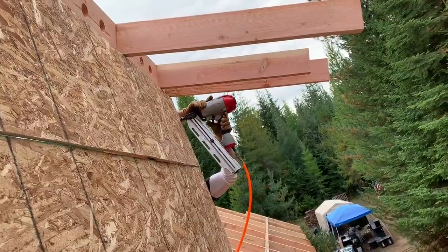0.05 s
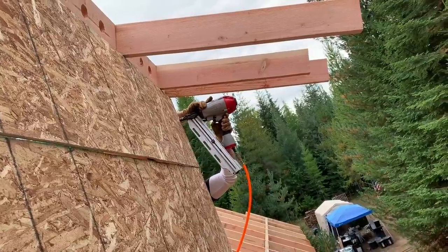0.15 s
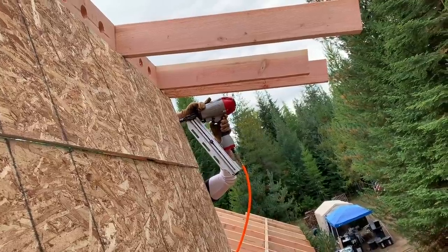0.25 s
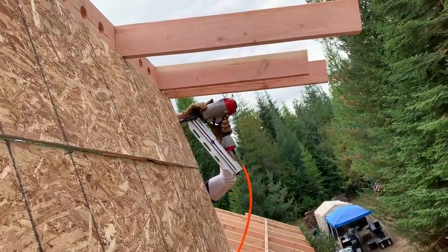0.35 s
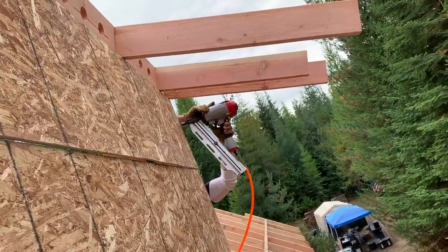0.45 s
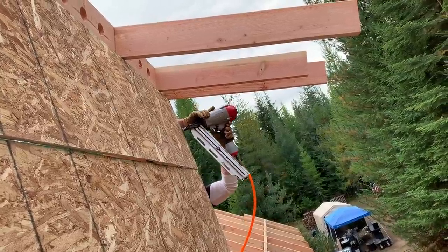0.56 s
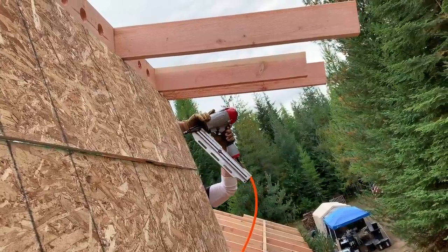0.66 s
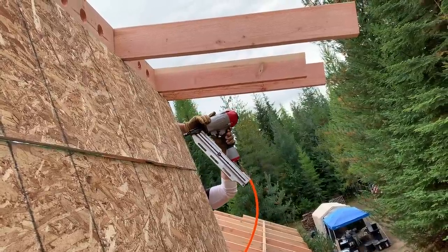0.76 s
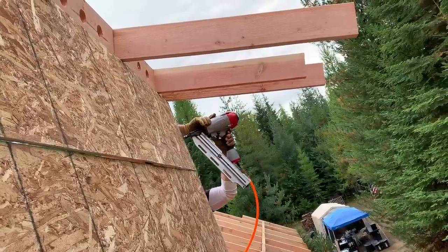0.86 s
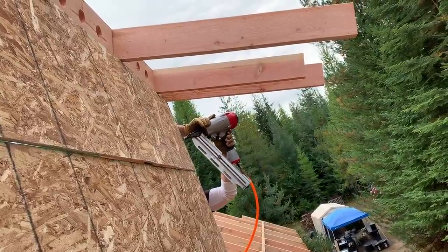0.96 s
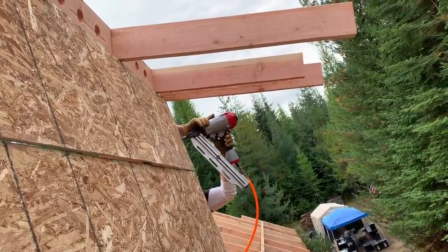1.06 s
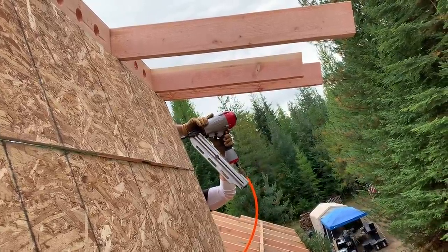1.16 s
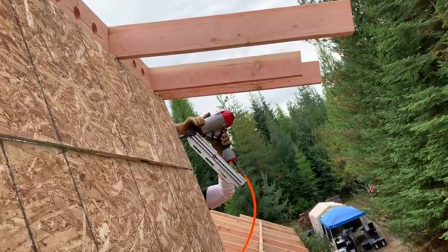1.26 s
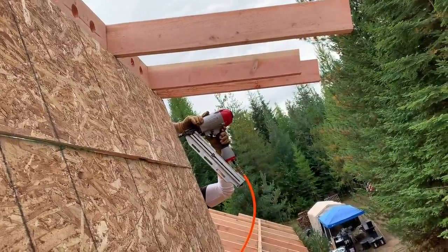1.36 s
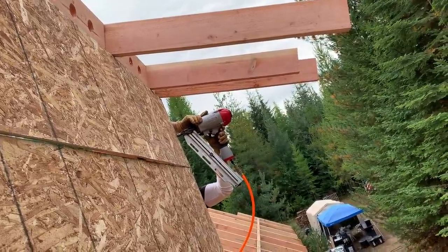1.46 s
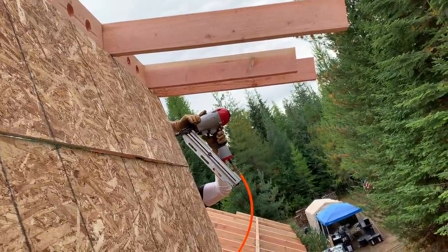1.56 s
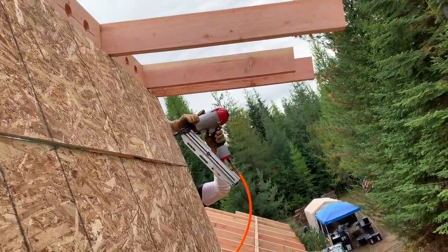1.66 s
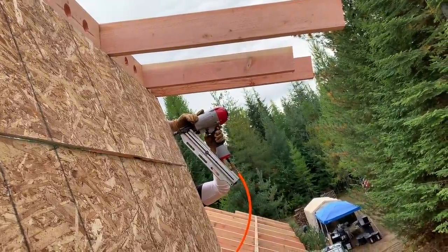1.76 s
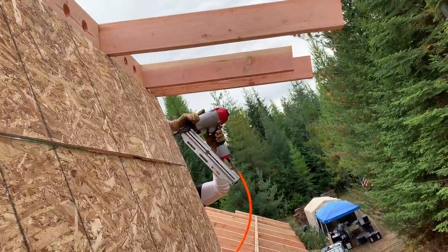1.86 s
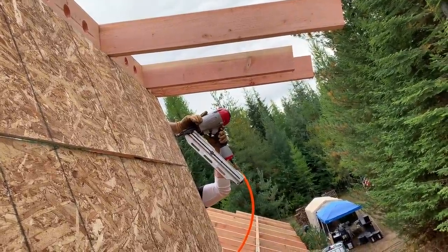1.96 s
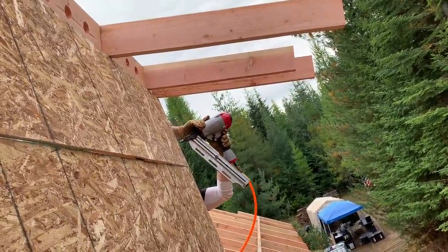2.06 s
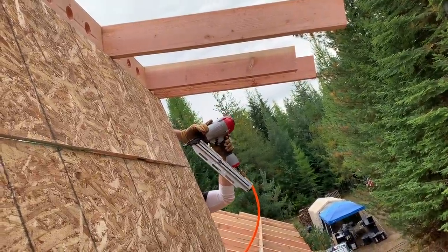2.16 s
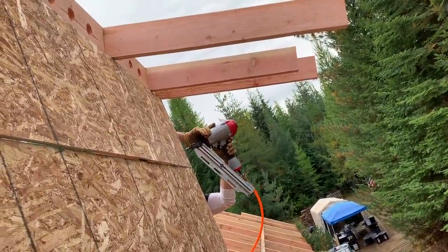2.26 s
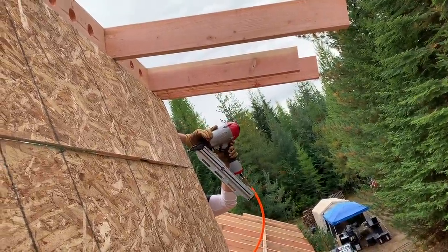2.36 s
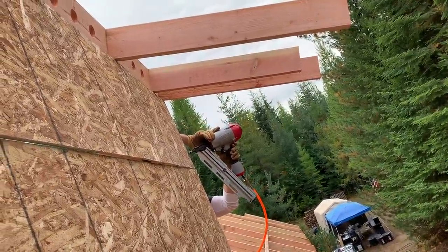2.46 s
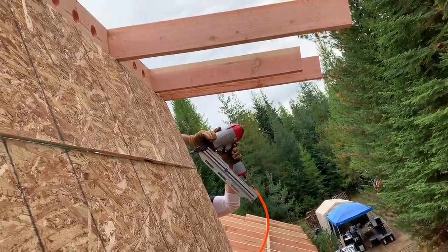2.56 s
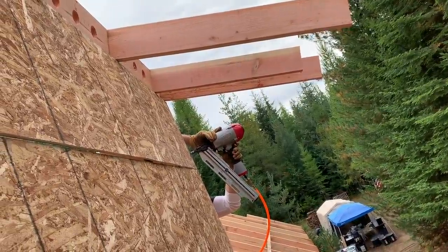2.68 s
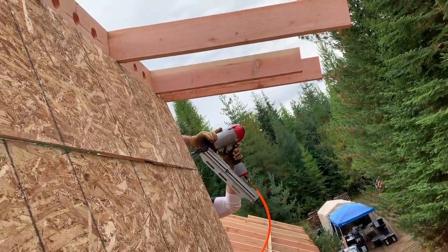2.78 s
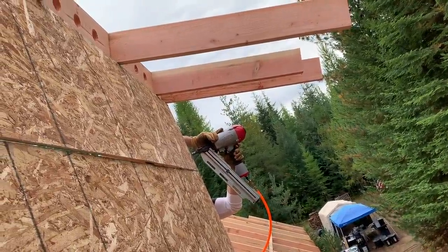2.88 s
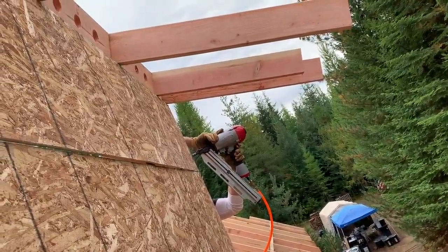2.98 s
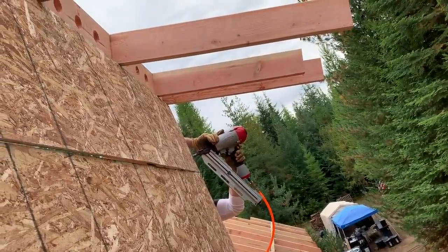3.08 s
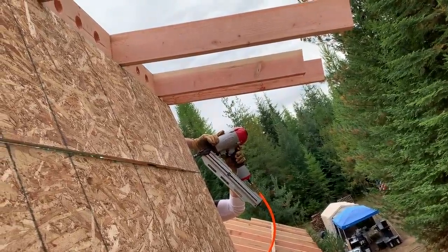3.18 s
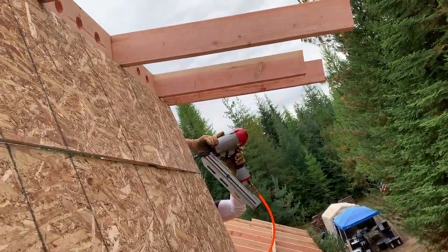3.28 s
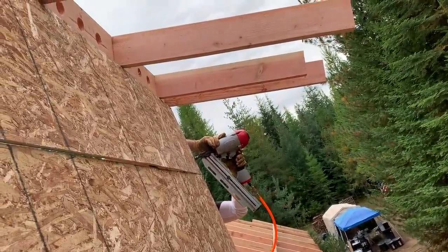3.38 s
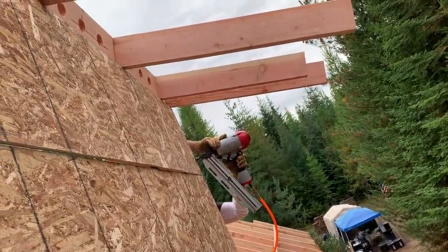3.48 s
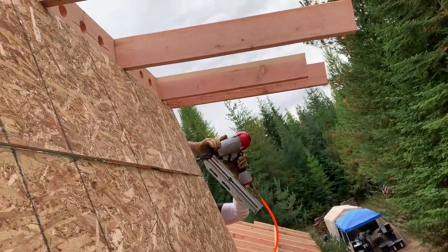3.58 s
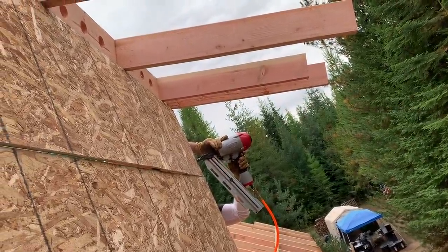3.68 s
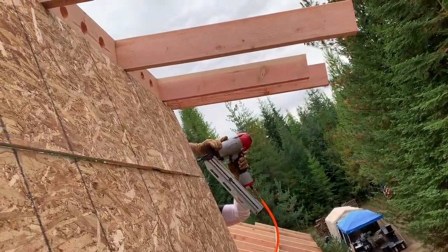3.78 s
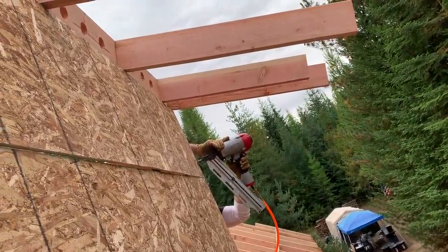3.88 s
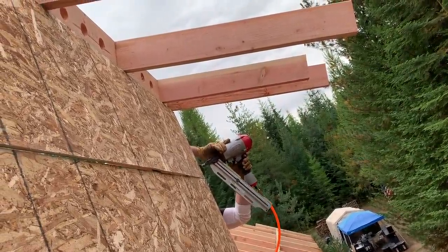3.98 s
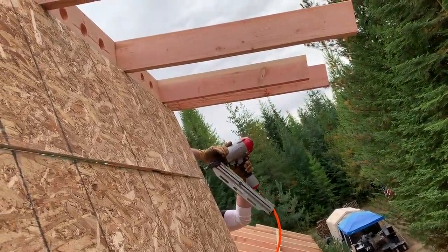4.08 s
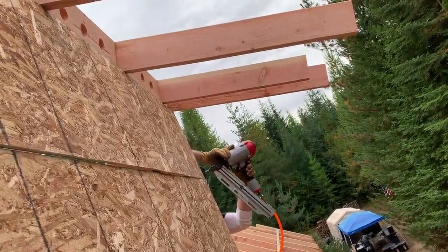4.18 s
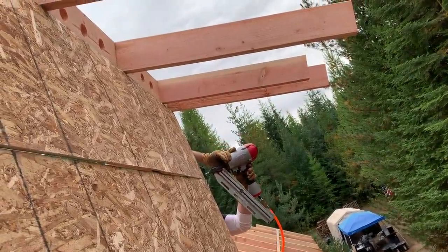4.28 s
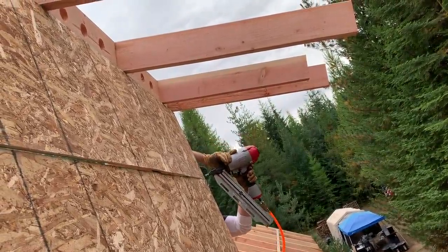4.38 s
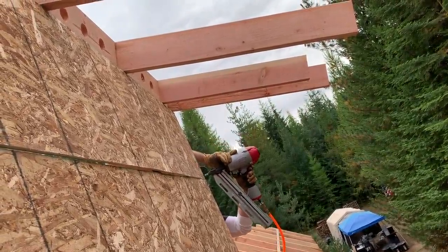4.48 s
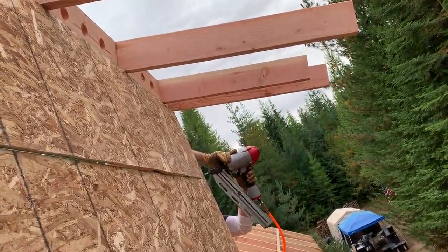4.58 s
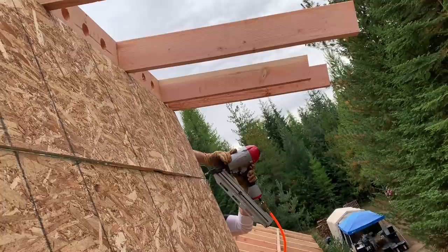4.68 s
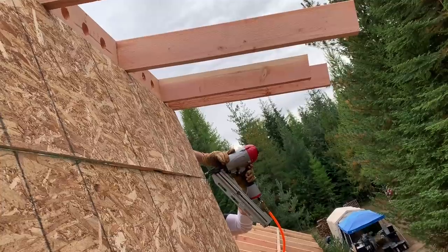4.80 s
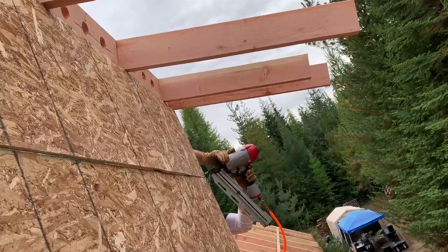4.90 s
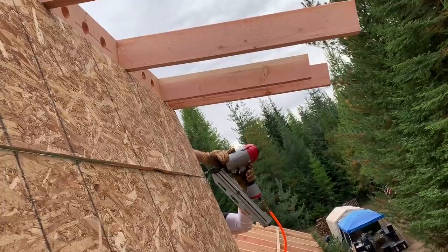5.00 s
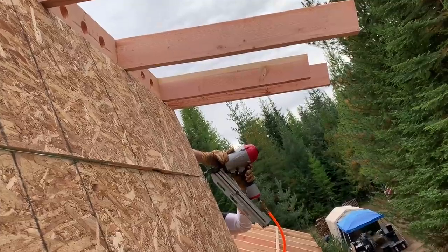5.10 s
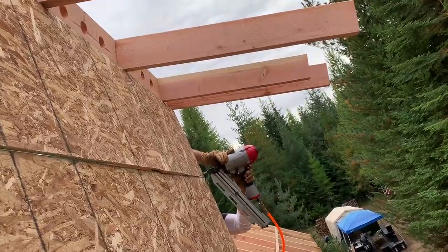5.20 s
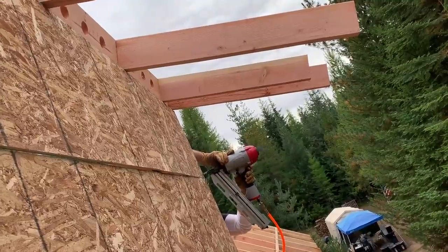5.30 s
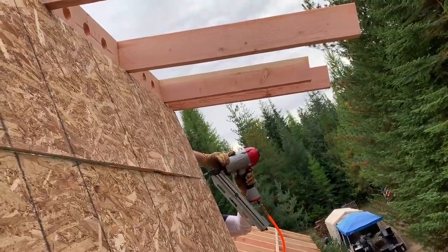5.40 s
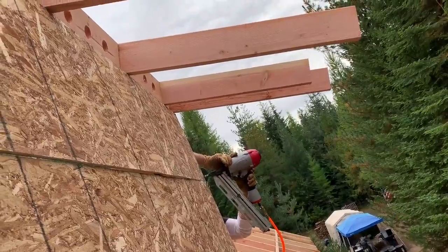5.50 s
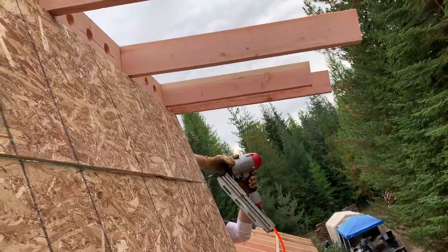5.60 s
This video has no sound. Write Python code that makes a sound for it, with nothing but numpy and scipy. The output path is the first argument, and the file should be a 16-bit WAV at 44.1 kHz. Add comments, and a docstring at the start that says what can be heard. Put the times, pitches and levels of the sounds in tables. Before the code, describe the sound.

A pneumatic framing nailer is heard close up in stereo at an open-air building site by trees. A faint low wall rumble is settling at the start. At 0.17 s the first shot cracks: a tiny trigger click, explosive pop, brief rush of air, hard woody blow with a fast falling chirp, low wall boom and a dull piston clack about 0.07 s later. Metallic rattles tick irregularly from 0.4 to 0.9 s, with a stronger nose bump at 1.31 s. The second shot comes at 1.75 s, a rattle at 1.98 and soft ticks near 2.4 s. Two faint far blows ring at 2.67 and 2.95 s. Soft contacts near 3.3 s precede the third shot at 3.70 s; a bright tick follows at 3.94. A clear tap at 4.87 s leads to the last shot at 5.32 s. Tails of one to two seconds scatter through the trees over a quiet bass-heavy background.

```python
"""A pneumatic framing nailer drives four nails into the sheathing of a timber wall at the edge of a forest.
The wall is still settling at the start. Each shot: the trigger clicks, the air starts softly, then the valve pops,
air rushes out, the driver blow runs through the panel as a falling chirp, the wall booms, the piston clacks home and
the trees answer; bands of hiss swell and fade late. The tool rattles (ringing modes struck by contact noise) and its
nose bumps the sheet between shots; two far blows ring in the trees between the second and third shot."""
import sys
import numpy as np
from scipy import signal
from scipy.fft import rfft, irfft, next_fast_len
from scipy.io import wavfile
from scipy.ndimage import uniform_filter1d, map_coordinates

SR = 44100
rng = np.random.default_rng(int(sys.argv[2]) if len(sys.argv) > 2 else 0)


def dump(signal):
    """Clip the signal to [-1, 1] and save it as 16-bit WAV at the path in sys.argv[1]."""
    limited = np.clip(np.atleast_2d(signal).T, -1, 1)
    pcm = np.round(limited * 32767).astype(np.int16)
    wavfile.write(sys.argv[1], SR, pcm)


N = 248891
TIME = np.arange(N) / SR
PAD = next_fast_len(N + SR)     # room for tails, so filtering does not wrap round
HZ = np.maximum(np.arange(PAD // 2 + 1) * SR / PAD, 1)


def from_db(db):
    """Decibels to gain."""
    return 10 ** (np.asarray(db) / 20)


def rms_one(x):
    """Scaled to rms 1."""
    return x / np.sqrt(np.mean(x ** 2) + 1e-20)


def at_hz(points, hz):
    """Reads a table on a log-frequency axis."""
    table_hz, values = np.array(points).T
    return np.interp(np.log(hz), np.log(np.maximum(table_hz, 1)), values)


def shaped(x, response):
    """Applies a frequency response."""
    return irfft(rfft(x, PAD) * response, PAD)[..., :N]


def clicks(times, gains):
    """One single-sample click per event."""
    out = np.zeros(N)
    samples = np.round(np.asarray(times) * SR).astype(int)
    np.add.at(out, np.clip(samples, 0, N - 1), gains)
    return out


def swell(start, rise, t60):
    """Envelope that rises, then dies away."""
    age = np.maximum(TIME - start, 0)
    return (1 - np.exp(-age / max(rise, 1e-4))) * from_db(-60 * age / t60)


def strike(excitation_of, modes):
    """Every mode is a two-pole resonator ringing from its own excitation."""
    out = 0
    for hz, level_db, t60 in modes:
        radius = from_db(-60 / (t60 * SR))
        angle = 2 * np.pi * hz / SR
        drive = [0, from_db(level_db) * np.sin(angle)]
        ring = [1, -2 * radius * np.cos(angle), radius ** 2]
        out = out + signal.lfilter(drive, ring, excitation_of(hz) + 1e-18)
    return out


# Likeness of left and right in diffuse sound: (frequency [Hz], likeness [-1 to 1])
LIKENESS = [(60, -0.2), (150, 0.96), (380, 0.57), (950, -0.29), (2380, 0.071), (5980, -0.68), (15000, 1)]


def diffuse(spectrum):
    """Coloured stereo noise whose left-right likeness is set by a mid and side balance per frequency; rms 1."""
    alike = np.clip(at_hz(LIKENESS, HZ), -1, 1)
    colour = from_db(at_hz(spectrum, HZ))
    mid, side = rng.standard_normal((2, N))
    mid = shaped(mid, colour * np.sqrt(1 + alike))
    side = shaped(side, colour * np.sqrt(1 - alike))
    return rms_one(np.array([mid + side, mid - side]))


FRAME = 512     # samples


def sculpted(noise, power_of):
    """Gives stereo noise a power that depends on frequency and time."""
    overlap = 3 * FRAME // 4
    hz, s, frames = signal.stft(noise, SR, nperseg=FRAME, noverlap=overlap)
    gain = np.sqrt(power_of(np.maximum(hz, 1)[:, None], s[None, :]))
    return signal.istft(frames * gain, SR, nperseg=FRAME, noverlap=overlap)[1][:, :N]


def patches(hz, s, patchy_db, rate=15.0, per_octave=1.3):
    """Power that wavers in patches of time and pitch, read from a grid of random knots."""
    knots = rng.standard_normal((40, 400))
    where = np.broadcast_arrays(per_octave * np.log2(hz), rate * s)
    return from_db(2 * patchy_db * map_coordinates(knots, where, order=1, mode="wrap"))


# The four shots: (valve pop time [s], pop level [dB], driver delay after the pop [s], pressure thump level [dB],
# piston return level [dB], trigger lead before the pop [s], trigger click level [dB], wall boom level [dB],
# air above the mean [dB])
SHOTS = [(0.1714, -6.5, 0.012, -25.5, -19.5, 0.04, -51, -53, 1.5),
         (1.749, -10, 0.015, -21, -29.5, 0.032, -46.5, -39, -0.84),
         (3.700, -15.5, .0142, -36.5, -22, 0.036, -53.5, -37.5, -0.94),
         (5.318, -22, 0.013, -45, -23, .033, -53, -35, -0.2)]
(POP_S, POP_DB, DRIVER_DELAY_S, THUMP_DB, RETURN_DB,
 TRIGGER_LEAD_S, TRIGGER_DB, BOOM_DB, SHOT_AIR_DB) = np.transpose(SHOTS)
DRIVER_S = POP_S + DRIVER_DELAY_S
# Colour of the valve pop: (frequency [Hz], relative level [dB per Hz])
POP_COLOUR = [(120, -30.5), (250, -4), (650, -2.5), (1400, -15.5), (2100, -2.5), (4400, -23), (7000, -11),
              (11000, -9), (16100, -24), (17000, -26)]
# Colour of the rushing exhaust: (frequency [Hz], relative level [dB per Hz])
AIR_COLOUR = [(240, -32), (400, -11), (4410, -13.5), (5000, -12.5), (6630, -8.5), (8120, -11),
              (8520, -21.5), (9500, -6), (12200, -10.5), (13600, -28), (15200, -6.5), (16200, -20.5),
              (17000, -93.5)]
# Stages in which the flow dies once the valve closes: (level [dB], t60 [s])
RELEASES = [(-8, 0.17), (-14, 0.22), (-31, .9)]
AIR_DB, POP_FLOW_DB = -19, -10.5      # mean exhaust at full flow; flow at the pop, relative to full
ONSET_S, ONSET_START_DB, ONSET_END_DB = .022, -50.5, -27  # soft start of the air burst, relative to full flow
FULL_S, CLOSE_S = .012, 0.019         # full flow is reached, the valve closes (after the pop)


def air():
    """Valve pop and exhaust: noise bursts, and noise that starts softly, rushes out and dies in stages."""
    pop = sum(from_db(db) * swell(s, 0.0016, 0.04) for s, db in zip(POP_S, POP_DB))
    flow = 0
    for pop_s, extra_db in zip(POP_S, SHOT_AIR_DB):
        age = TIME - pop_s
        opening_db = np.interp(age, [-ONSET_S, -.001, 0, FULL_S],
                               [ONSET_START_DB, ONSET_END_DB, POP_FLOW_DB, 0], left=-200)
        since_close = np.maximum(age - CLOSE_S, 0)
        closing = sum(from_db(db - 60 * since_close / t60) for db, t60 in RELEASES)
        flow = flow + from_db(AIR_DB + extra_db) * np.where(age < CLOSE_S, from_db(opening_db), closing)
    pop_noise, air_noise = rng.standard_normal((2, N))
    sputter_db = 2.0 * rms_one(uniform_filter1d(rng.standard_normal(N), size=60))   # turbulence
    pop_hiss = rms_one(shaped(pop_noise, from_db(at_hz(POP_COLOUR, HZ))))
    air_hiss = rms_one(shaped(air_noise, from_db(at_hz(AIR_COLOUR, HZ))))
    return pop * pop_hiss + flow * from_db(sputter_db) * air_hiss


def thump():
    """The released air pushes once, slowly, against the microphone, and the pressure swings back."""
    out = 0
    for pop_s, db in zip(POP_S, THUMP_DB):
        age = np.maximum(TIME - pop_s - .01, 0) / 0.0025
        out = out + from_db(db) * 2 * age * (2 - age) * np.exp(-age)
    return out


# Colour of a blow on the sheathing panel: (frequency [Hz], relative level [dB per Hz])
BLOW_COLOUR = [(100, -16.5), (300, -0.5), (800, -17.5), (1500, -0.5), (2000, 3), (3200, 0), (4300, -12),
               (6000, -24.5), (10000, -44.5)]
# Paths of the bending waves: (delay [s], path length ratio [1], level [dB])
PANEL_PATHS = [(0, 1.06, 13), (.0007, 1.2, -5.5), (.0016, 2.5, -6.5), (.004, 1.8, -11)]
PANEL_SPREAD = .27      # over ratio 1, a bending wave of f Hz arrives this many s / sqrt(f) late


def panel(hits):
    """Bending waves: treble runs ahead of bass, so each blow arrives as falling chirps along a few paths."""
    paths = 0
    for delay, ratio, db in PANEL_PATHS:
        cycles = HZ * delay + 2 * PANEL_SPREAD * ratio * np.sqrt(HZ)
        paths = paths + from_db(db) * np.exp(-2j * np.pi * cycles)
    response = paths * from_db(at_hz(BLOW_COLOUR, HZ))
    return shaped(hits, response / np.abs(irfft(response, PAD)).max())


# The nose lands on the sheet: (time [s], tap level [dB], wall boom level [dB], sheet thud level [dB])
BUMPS = [(1.311, -39, -32.5, -41), (2.408, -54, -54.5, -67), (3.289, -63, -41, -60),
         (4.87, -38, -42.5, -44.5)]
BLOW_DB = -4            # driver blow, alike in every shot


def blows():
    """The driver hits the nail home with a short, grainy chatter; the nose taps the same sheet."""
    ahead = PANEL_SPREAD / np.sqrt(2200)       # travel time of the strongest part
    struck = [(s, BLOW_DB) for s in DRIVER_S] + [row[:2] for row in BUMPS]
    times, levels_db = np.transpose(struck)
    hits = clicks(times - ahead, from_db(levels_db))
    chatter = sum(from_db(BLOW_DB - 16.0) * swell(s - ahead - .005, 0.0013, 0.062) for s in DRIVER_S)
    grains = rng.standard_normal(N) * (rng.random(N) < 4000 / SR)      # about 4000 grains per second
    return panel(hits + chatter * grains)


# Modes of the framed wall: (frequency [Hz], relative level [dB], t60 [s])
WALL_MODES = [(56.4, -15.5, 0.81), (71.7, -2.5, 0.4), (71, -6.5, 0.37), (87.7, -2, 0.35),
              (102.3, -2.5, 0.39), (108.7, -1.5, .4), (121, 1, 0.2), (138, -6, 0.23), (142, -13, 0.82),
              (158.5, -4, 0.13)]
# Modes of the sheet: (frequency [Hz], relative level [dB], t60 [s])
SHEET_MODES = [(171, -7, 0.2), (229, -6, .2), (256.86, -3.5, 0.11), (318.4, -3, 0.13), (353, -2, 0.093),
               (433.5, -4.5, 0.13), (475, -5.5, 0.2), (573, -9, 0.15), (655, -3, 0.033)]
THUD_DB = -30           # sheet thud, alike in every shot
# What a -35 dB rattle passes to wall and sheet, and the share of its level swing that follows
KNOCK_BOOM_DB, KNOCK_THUD_DB, KNOCK_FOLLOWS = -61, -61.5, .3
STIR_RISE_S, STIR_T60_S = .12, 1.0      # after a blow the whole frame stirs late and settles
STIR_SHOT_DB, STIR_BUMP_DB, STIR_FAR_DB = -37.5, -8.5, -15  # after a shot; re a bump's boom; re a far blow
STIR_BEFORE_DB, STIR_REST_DB = -48.5, -72.5     # still settling at the start; at rest


def wall():
    """Modes of wall and sheet, struck by shots, bumps and rattles with new strengths each time; the frame stirs."""
    shots = [(s + .002, boom, THUD_DB) for s, boom in zip(DRIVER_S, BOOM_DB)]
    bumps = [(s + 0.0084, boom, thud) for s, tap, boom, thud in BUMPS]
    knocks = []
    for s, peak_db, *_ in KNOCKS:
        swing_db = KNOCK_FOLLOWS * (peak_db + 35)
        knocks.append((s + .008, KNOCK_BOOM_DB + swing_db, KNOCK_THUD_DB + swing_db))
    times, boom_db, thud_db = np.transpose(shots + bumps + knocks)

    def pushes(levels_db, scatter_s, hz):
        """One click per event, late by its bending-wave travel, with chance in time and level."""
        late, strength = rng.random((len(times), 2)).T
        arrivals = times + PANEL_SPREAD / np.sqrt(hz) - .022 + scatter_s * late
        return clicks(arrivals, from_db(levels_db + 8.0 * (strength - .5)))

    # each event pushes every mode twice: a tight push and a more scattered one
    booms = strike(lambda hz: pushes(boom_db - 3.0, 0.012, hz) + pushes(boom_db - 7, 0.11, hz), WALL_MODES)
    thuds = strike(lambda hz: pushes(thud_db, .007, hz) + pushes(thud_db - 2, .035, hz), SHEET_MODES)
    stir = rms_one(strike(lambda hz: rng.standard_normal(N), WALL_MODES))
    stirred = [(s, STIR_SHOT_DB) for s in POP_S]
    stirred += [(s, boom + STIR_BUMP_DB) for s, tap, boom, thud in BUMPS]
    stirred += [(s, db + STIR_FAR_DB) for s, db in FAR_BLOWS]
    level = from_db(STIR_REST_DB) + from_db(STIR_BEFORE_DB - 31 * TIME)     # settles by 31 dB per second
    level = level + sum(from_db(db) * swell(s, STIR_RISE_S, STIR_T60_S) for s, db in stirred)
    return booms + thuds + stir * level


# The tool rattling: (time [s], peak level [dB], brightness [dB], rattle length [s], part struck [Hz])
KNOCKS = [(0.4354, -23.5, -6, 0.0037, 1190), (0.582, -23, -5, 0.0033, 1750),
          (0.629, -33.5, -7.5, 0.016, 1670), (0.6616, -28.5, -22, 0.003, 1700),
          (0.8142, -26, -7, 0.003, 1440), (0.8566, -33, -16, 0.0027, 1350), (0.8653, -35, -7, 0.0043, 1350),
          (0.876, -37, -16, 0.0072, 1450), (0.9037, -34, -11.5, 0.0051, 1340),
          (1.0744, -44.5, -8, 0.002, 1896), (1.0865, -41.5, -9, 0.0037, 2120),
          (1.219, -50.5, -27, 0.004, 1337), (1.2318, -47, -11.5, 0.0056, 1960),
          (1.2707, -51.5, -12, 0.011, 2120), (1.301, -39, -9, 0.007, 1840),
          (1.31, -18.5, -6.5, 0.0023, 2100), (1.3438, -43, -5, 0.0043, 1360),
          (1.9803, -30, -4, 0.0052, 1240), (2.4044, -46, -8.5, 0.005, 1526),
          (2.434, -41.5, -13, 0.0058, 1535), (2.547, -39, -3.5, 0.0045, 1310),
          (3.213, -47, -17.5, 0.0036, 1910), (3.284, -38, -10, 0.0061, 1900), (3.307, -48, -2, 0.013, 1450),
          (3.9388, -30, 4.5, 0.0027, 2150), (4.678, -62.5, -29.5, 0.0072, 1310),
          (4.785, -60, -22, 0.0047, 1840), (4.823, -62.5, -19.5, 0.012, 1840),
          (4.868, -26.5, -7, 0.0076, 1980), (4.8935, -52.5, 6.5, 0.011, 2200),
          (5.5603, -35.5, -14, 0.0051, 1410)]
# Modes of magazine and body: (frequency [Hz], relative level [dB], t60 [s])
TOOL_MODES = [(1340, -6, 0.017), (1600, -6.5, 0.01), (2160, -4.5, 0.0082), (2210, 4, 0.0083),
              (2480, -7.5, .02), (3480, -10.5, 0.026), (3860, -1, 0.018), (4290, -2.5, 0.017),
              (5100, -15, 0.007), (6190, -5, 0.012), (6830, -4, 0.0097)]
RETURN_DELAY_S = .074                           # the piston is home this long after the pop
RETURN_HZ, RETURN_S = 1500, .007                # it meets its bumper with a dull clack
BOUNCE_S, BOUNCE_DB = 0.012, -5.5               # and bounces once
TRIGGER_HZ, TRIGGER_S = 2100, 0.0025
FOCUS_DB = 16           # modes an octave from the struck part ring this much weaker
TREBLE_RING_HZ, TREBLE_RING_DB = 3000, -7.5     # modes above this ring with the brightness of the contact
BARE_HZ = 4996          # contact noise above this is heard without the ring of the tool


def tool():
    """Short bursts of contact noise ring the magazine and body; the brightest part is heard bare."""
    returns = [(s + RETURN_DELAY_S + k * BOUNCE_S, db + k * BOUNCE_DB, -20, RETURN_S, RETURN_HZ)
               for s, db in zip(POP_S, RETURN_DB) for k in range(2)]
    triggers = [(s - lead, db, -14, TRIGGER_S, TRIGGER_HZ)
                for s, lead, db in zip(POP_S, TRIGGER_LEAD_S, TRIGGER_DB)]
    start_s, peak_db, bright_db, length_s, part_hz = np.array(KNOCKS + returns + triggers).T
    span = np.arange(int(.12 * SR))
    age = span / SR / length_s[:, None]
    shapes = (age * np.exp(1 - age)) ** 2       # swells to its peak in one rattle length
    first = np.round((start_s - .5 * length_s) * SR).astype(int)
    where = np.minimum(first[:, None] + span, N - 1)

    def bursts(levels_db):
        """Noise under the summed envelopes of all contacts."""
        weighted = from_db(levels_db)[:, None] * shapes
        envelope = np.bincount(where.ravel(), weighted.ravel(), minlength=N)
        return envelope * rng.standard_normal(N)

    def excitation(hz):
        """Low modes favour the struck part, high ones follow the brightness; each contact varies by chance."""
        chance_db = rng.normal(0, 4, len(start_s))
        focus_db = -FOCUS_DB * np.abs(np.log2(hz / part_hz))
        colour_db = focus_db if hz < TREBLE_RING_HZ else bright_db + TREBLE_RING_DB
        return bursts(peak_db + chance_db + colour_db)

    high_pass = signal.butter(2, BARE_HZ, "high", fs=SR, output="sos")
    tick = signal.sosfilt(high_pass, bursts(peak_db + bright_db))
    return from_db(-25.5) * strike(excitation, TOOL_MODES) + from_db(-8.5) * tick


# Decay of scattered sound at full length: (frequency [Hz], t60 [s])
TREES_T60 = [(150, 1.1), (500, 1.1), (1500, 1.73), (4000, 1.3), (8000, 0.81), (16000, .5)]


def scatter(spectrum, events, patchy_db):
    """Uneven scattered sound after events (time [s], level [dB], share of the t60 [1], swell [s])."""
    def power_of(hz, s):
        t60 = at_hz(TREES_T60, hz)
        power = 0 * hz * s
        for start, db, share, rise in events:
            after = np.searchsorted(s[0], start)
            age = s[:, after:] - start
            power[:, after:] += (1 - np.exp(-age / rise)) * from_db(2 * db - 120 * age / (share * t60))
        return power * patches(hz, s, patchy_db)
    return sculpted(diffuse(spectrum), power_of)


# Colour of what trees and timbers return: (frequency [Hz], relative level [dB per Hz])
TREES_COLOUR = [(88, -37.5), (150, -1), (280, -10.5), (3920, -19.5), (7040, -17.5), (8730, -29),
                (11000, -29.5), (12700, -39.5), (13700, -55.5), (16000, -41.5)]
# Far blows: (time [s], level [dB])
FAR_BLOWS = [(2.667, -44), (2.949, -42.5)]
# Colour of the far blows: (frequency [Hz], relative level [dB per Hz])
FAR_COLOUR = [(88, -39.5), (150, -13), (550, -13.5), (720, -7.5), (1000, -0.5), (1300, -9.5), (1550, -20),
              (3500, -16), (7500, -19.5), (8560, -35.5), (9600, -19.5), (12500, -25), (13500, -47),
              (16000, -52)]
TREES_DB, TIMBERS_DB = -39, -29.5       # scattered sound of a mean shot; of a knock, re its peak
FAR_REPEAT_S, FAR_REPEAT_DB = 0.022, -7.5       # each far blow comes back once


def trees():
    """Trunks scatter the shots and the far blows into long tails, the timbers return knocks briefly."""
    shots = [(s + 0.011, TREES_DB + extra_db, 1.0, .008) for s, extra_db in zip(POP_S, SHOT_AIR_DB)]
    knocks = [(s, peak_db + TIMBERS_DB, .3, .004) for s, peak_db, *_ in KNOCKS]
    far = [(s + k * FAR_REPEAT_S, db + k * FAR_REPEAT_DB, .62, .018) for s, db in FAR_BLOWS for k in range(2)]
    return scatter(TREES_COLOUR, shots + knocks, patchy_db=0.97) + scatter(FAR_COLOUR, far, patchy_db=4.0)


# Bands of hiss that swell and fade after the shots:
# (time [s], level [dB], smear [s], centre [Hz], width [Hz])
SWELLS = [(0.643, -44, 0.064, 1860, 353), (.55, -54.5, 0.14, 570, 299.4), (2.14, -53, 0.036, 1840, 400),
          (4.209, -64, 0.059, 1960, 494), (4.3, -67, 0.062, 795, 297.6), (5.52, -53, 0.055, 3080, 1470)]


def late_swells():
    """Smeared, coloured bands of hiss swell and fade after each shot."""
    def power_of(hz, s):
        power = 0
        for at, db, smear, centre_hz, width in SWELLS:
            density = from_db(2 * db) * SR / 2 / width
            rise_and_fall = np.exp(-((s - at) / smear) ** 2)
            band = 1 / (1 + (2 * (hz - centre_hz) / width) ** 4)
            power = power + density * rise_and_fall * band
        return patches(hz, s, 3.0) * power
    return sculpted(rng.standard_normal((2, N)), power_of)


# Colour of the steady background: (frequency [Hz], relative level [dB per Hz])
QUIET_COLOUR = [(24, -38), (40, -7), (104, -2.5), (226, -15), (320, -10.5), (1180, -23.5), (1900, -29.5),
                (4340, -43), (8550, -61.5), (11000, -53), (16000, -65)]


def quiet():
    """A steady, bass-heavy background of diffuse noise."""
    return from_db(-68.5) * diffuse(QUIET_COLOUR)


# Phase of near sound between the channels: (frequency [Hz], left leads by [rad])
LEAD = [(0, 0), (430, 0.62), (1720, 0.83), (2330, 1.92), (3530, 8), (4130, 6.5), (5340, 8.5), (7410, 4.5),
        (10400, 0.53), (12000, 0.3), (12900, -2.5), (14500, -2.5), (15200, -2), (16700, 1)]
# Balance of near sound: (frequency [Hz], left minus right [dB])
TILT = [(60, 2.5), (130, 2.5), (290, 6), (640, 7), (1410, 3.5), (3100, -4.5), (6820, -2.5), (15000, 2)]
EARLY_DB, EARLY_T60_S = -6.5, .045      # reflections off rafters and deck


def scene():
    """Near sound gets a left-right phase and balance and early reflections; the scattered rest is diffuse."""
    near = air() + blows() + tool()
    early = rng.standard_normal((2, 4000)) * from_db(-60 * TIME[:4000] / EARLY_T60_S)
    early = from_db(EARLY_DB) * early / np.sqrt(np.sum(early ** 2, axis=1, keepdims=True))
    half = from_db(at_hz(TILT, HZ) / 2) * np.exp(.5j * at_hz(LEAD, HZ))     # half to each side
    placed = shaped(near + wall() + thump(), np.array([half, 1 / half]))    # left, right
    reflected = shaped(near, rfft(early, PAD))
    return placed + reflected + trees() + late_swells() + quiet()


# A dip in the sound near 8.3 kHz: (frequency [Hz], width [Hz], level [dB])
DIPS = [(8260, 310, -8)]
BASS_CUT_HZ, CUTOFF_HZ = 34, 17300


def record(dry):
    """A narrow dip, bass roll-off, rounded peaks, steep top cut."""
    dip_db = sum(db / (1 + (2 * (HZ - hz) / width) ** 4) for hz, width, db in DIPS)
    bass_cut = signal.butter(3, BASS_CUT_HZ, "high", fs=SR, output="sos")
    top_cut = signal.cheby2(12, 70, CUTOFF_HZ, fs=SR, output="sos")
    heard = signal.sosfilt(bass_cut, shaped(dry, from_db(dip_db)))
    heard = 1.083 * np.tanh(heard / 1.014)
    return signal.sosfilt(top_cut, heard)


dry = scene()
out = record(dry)
dump(out)
```